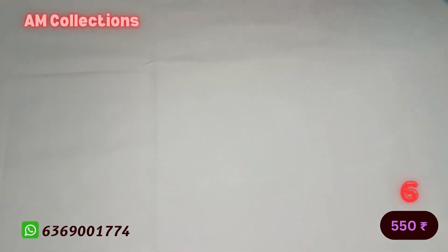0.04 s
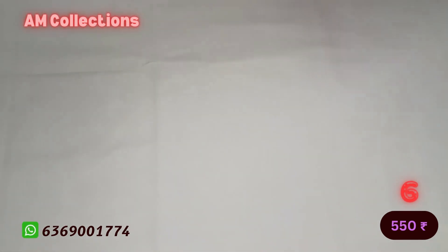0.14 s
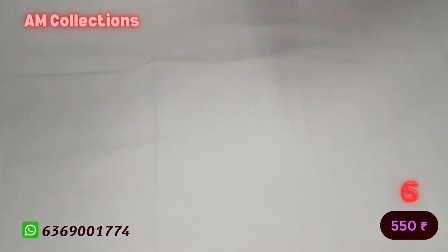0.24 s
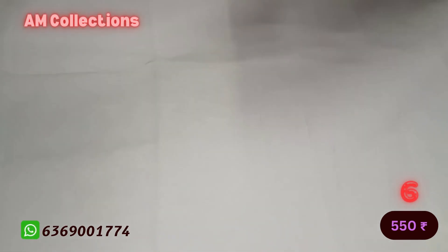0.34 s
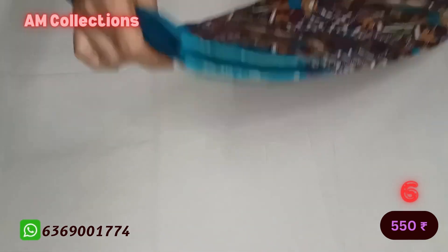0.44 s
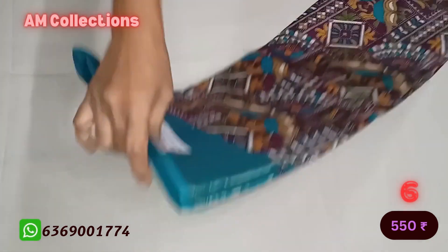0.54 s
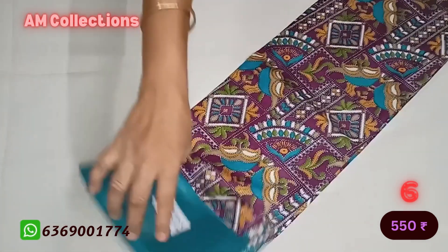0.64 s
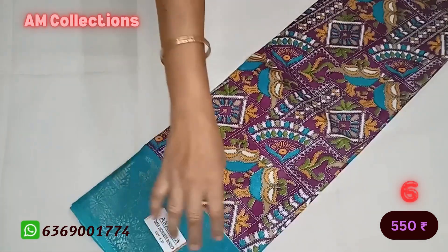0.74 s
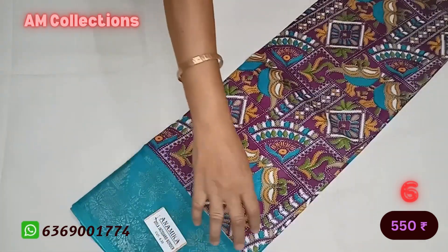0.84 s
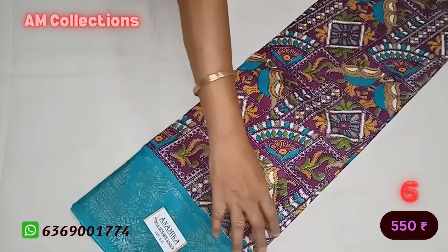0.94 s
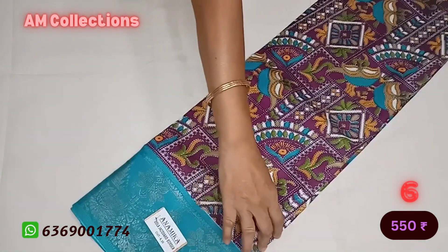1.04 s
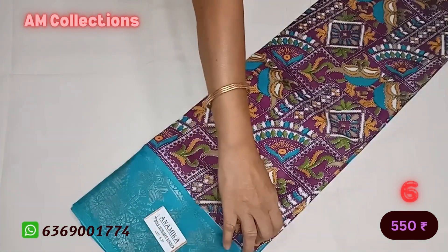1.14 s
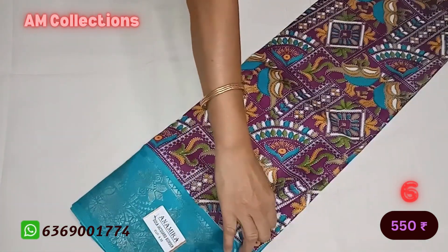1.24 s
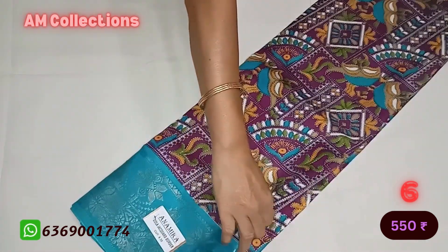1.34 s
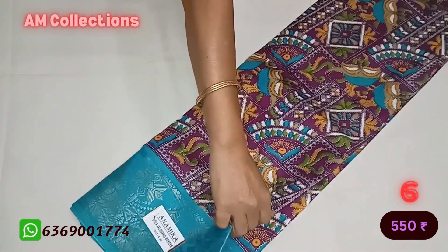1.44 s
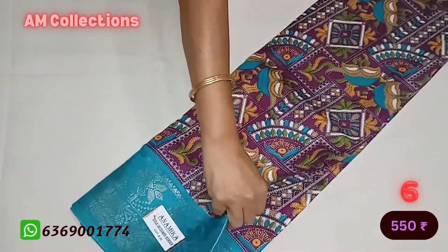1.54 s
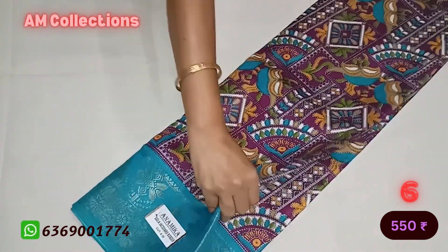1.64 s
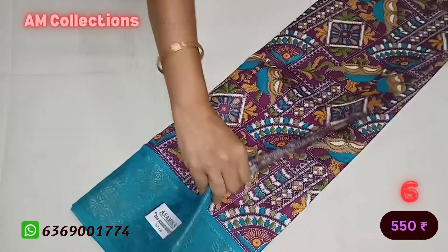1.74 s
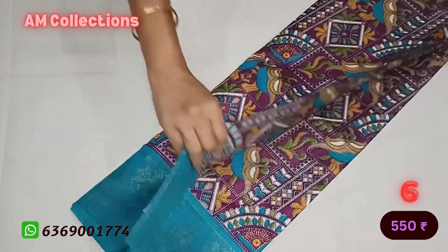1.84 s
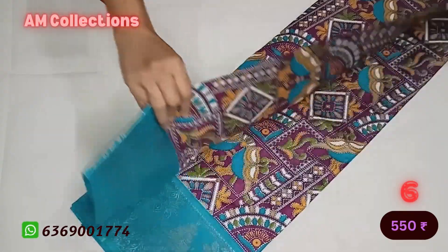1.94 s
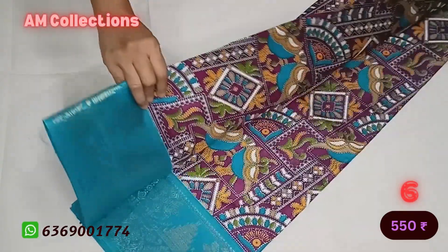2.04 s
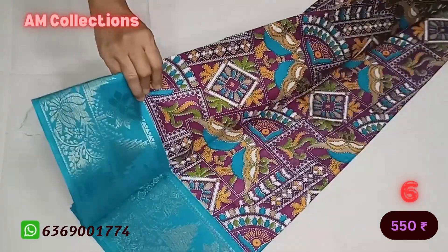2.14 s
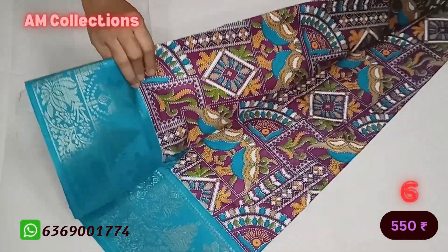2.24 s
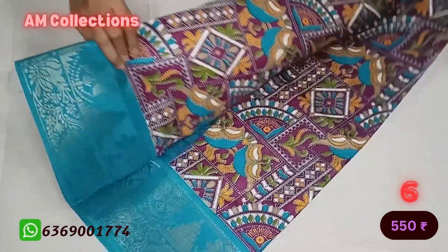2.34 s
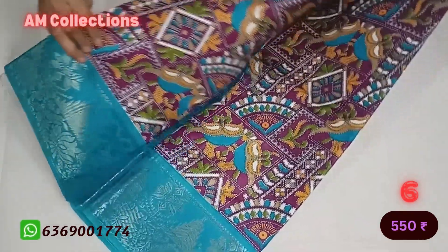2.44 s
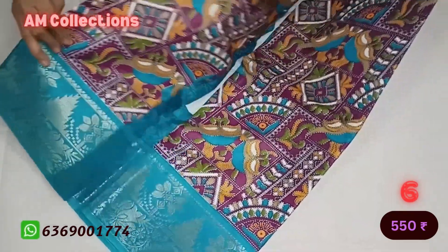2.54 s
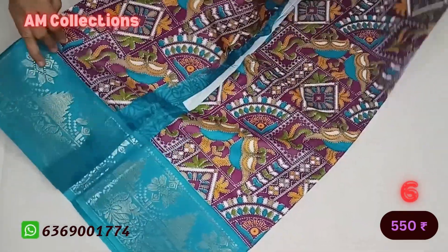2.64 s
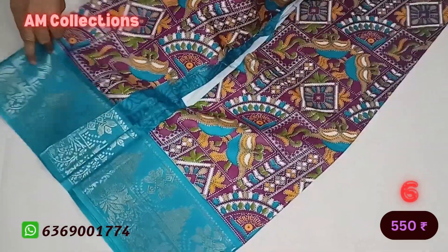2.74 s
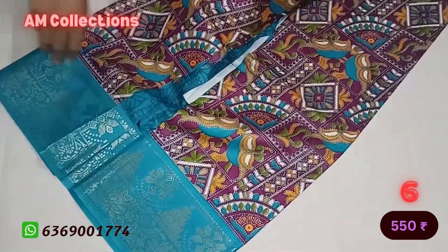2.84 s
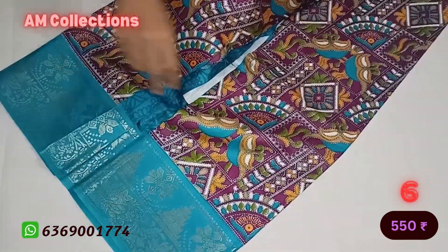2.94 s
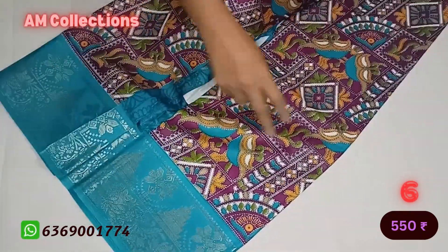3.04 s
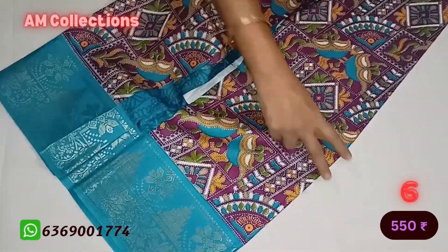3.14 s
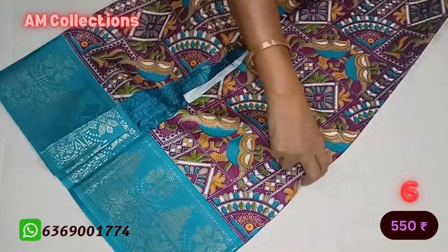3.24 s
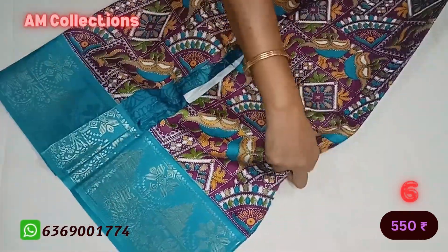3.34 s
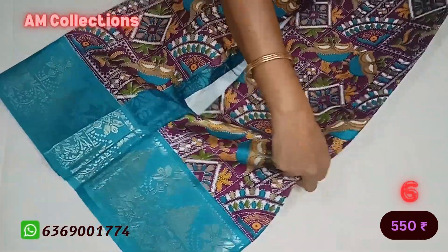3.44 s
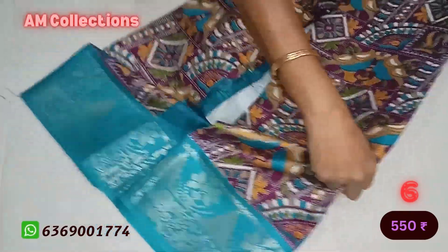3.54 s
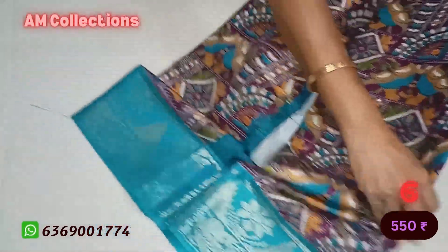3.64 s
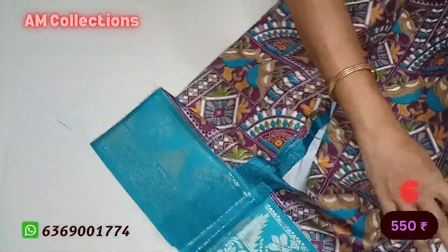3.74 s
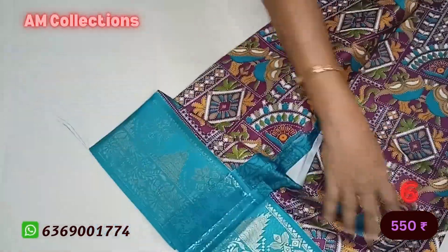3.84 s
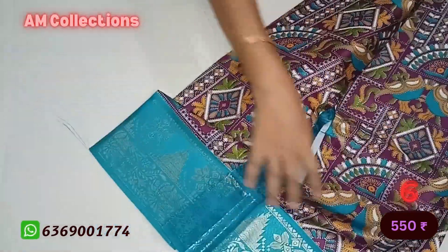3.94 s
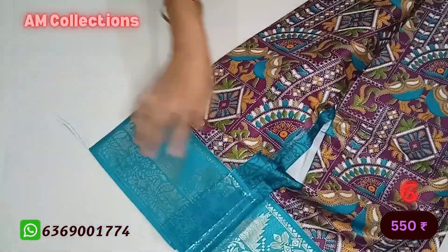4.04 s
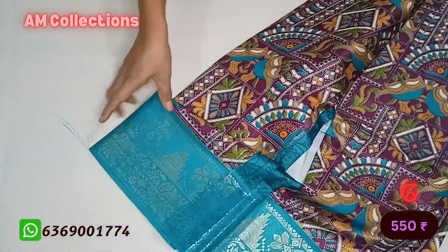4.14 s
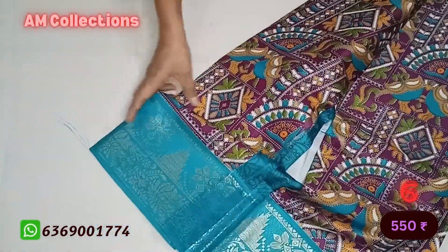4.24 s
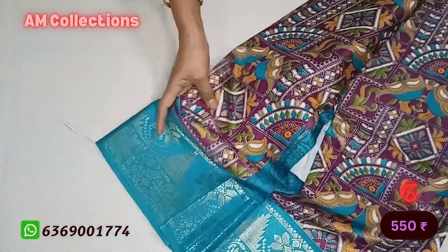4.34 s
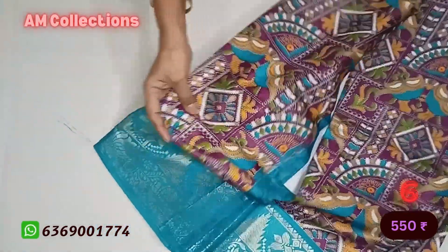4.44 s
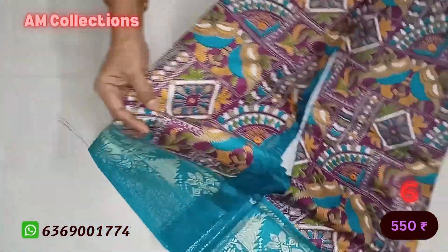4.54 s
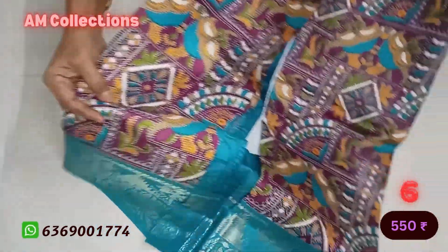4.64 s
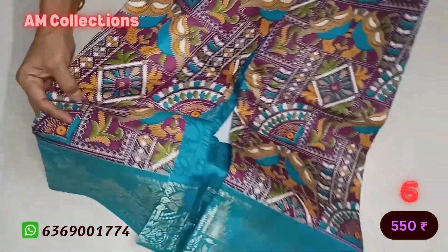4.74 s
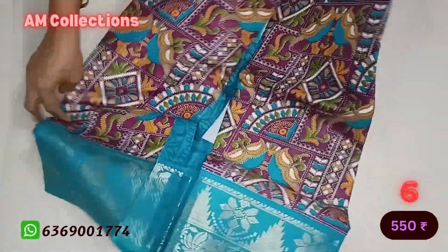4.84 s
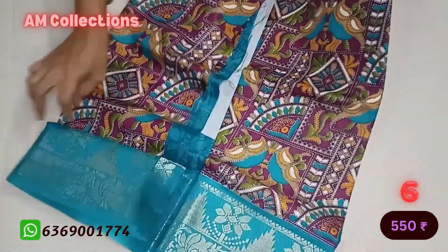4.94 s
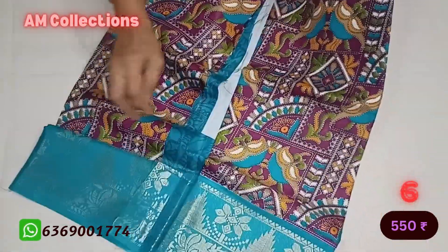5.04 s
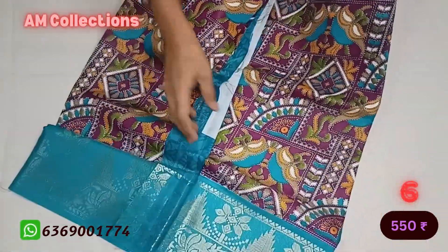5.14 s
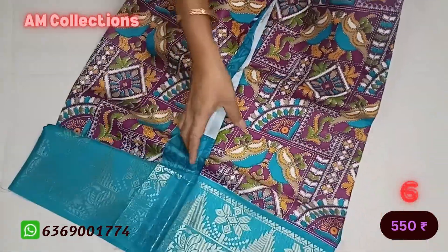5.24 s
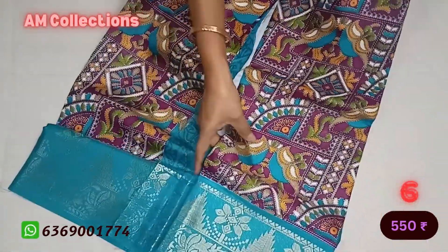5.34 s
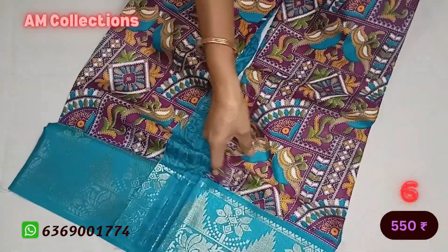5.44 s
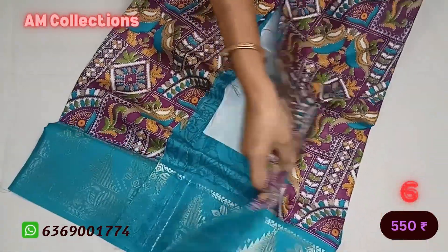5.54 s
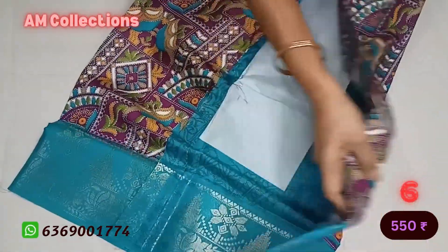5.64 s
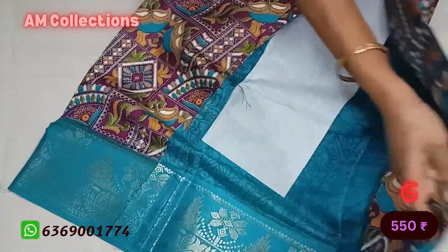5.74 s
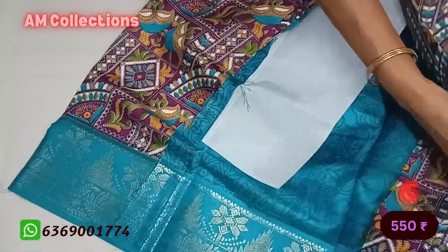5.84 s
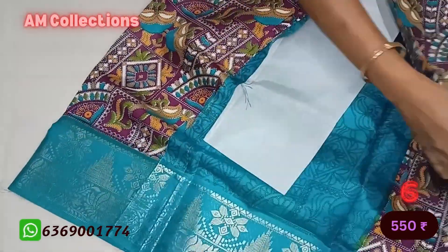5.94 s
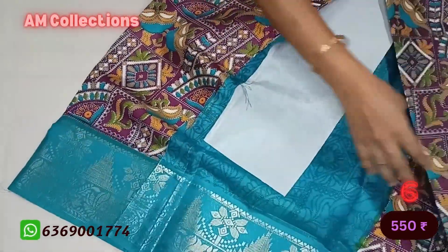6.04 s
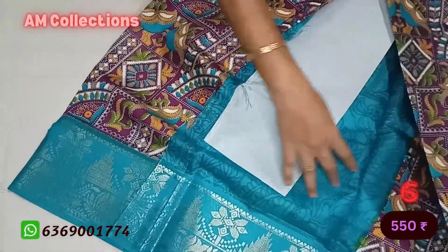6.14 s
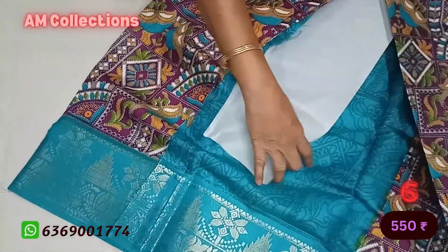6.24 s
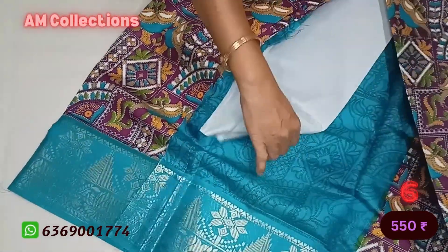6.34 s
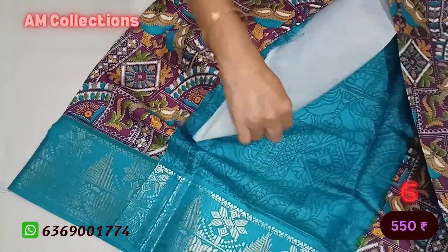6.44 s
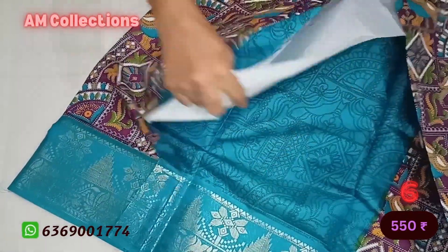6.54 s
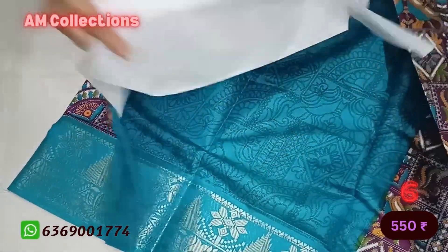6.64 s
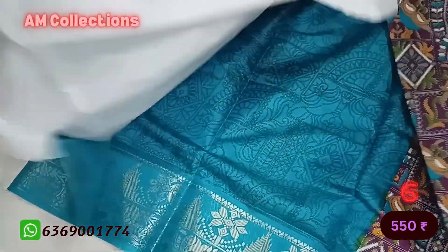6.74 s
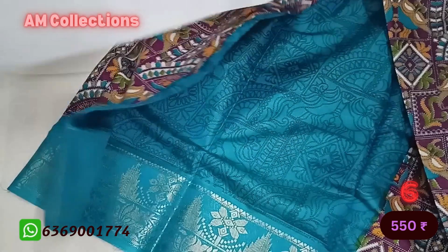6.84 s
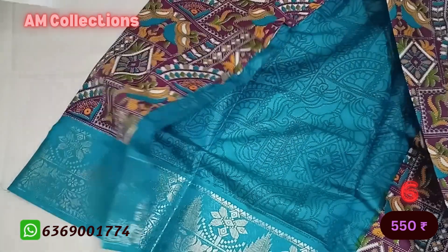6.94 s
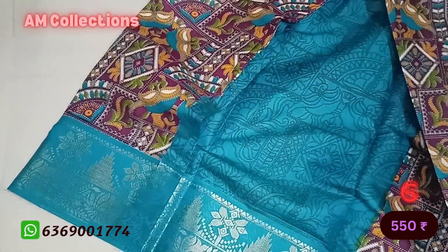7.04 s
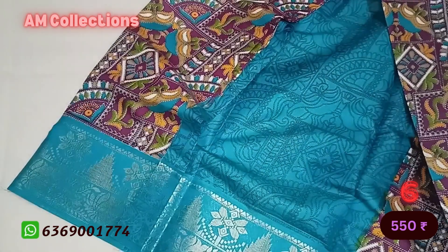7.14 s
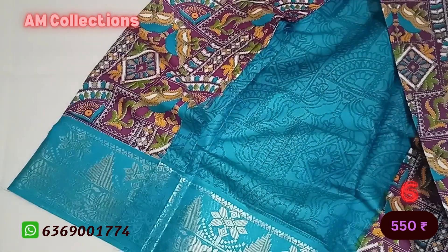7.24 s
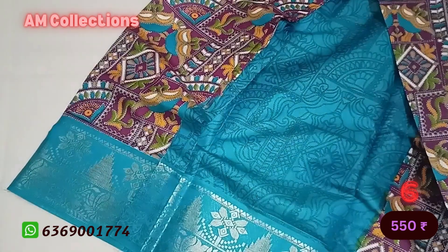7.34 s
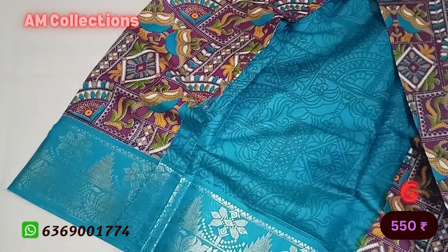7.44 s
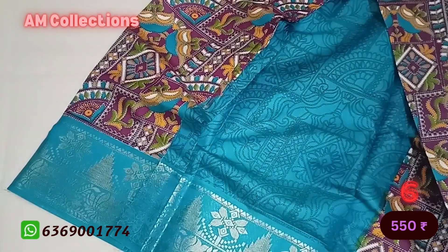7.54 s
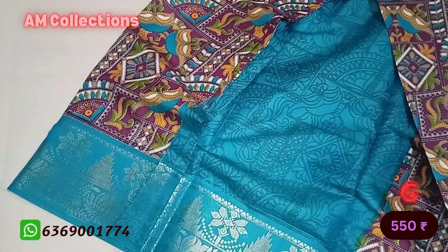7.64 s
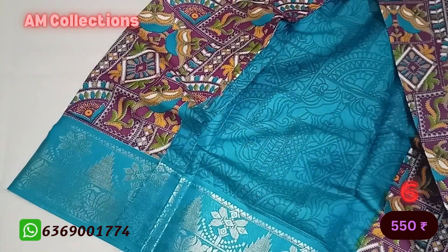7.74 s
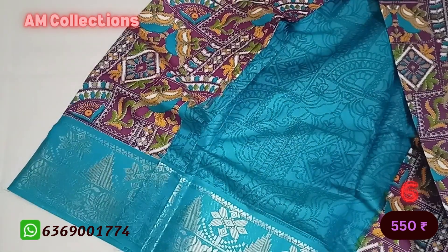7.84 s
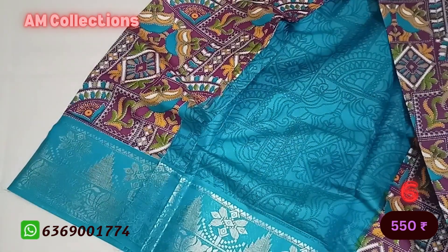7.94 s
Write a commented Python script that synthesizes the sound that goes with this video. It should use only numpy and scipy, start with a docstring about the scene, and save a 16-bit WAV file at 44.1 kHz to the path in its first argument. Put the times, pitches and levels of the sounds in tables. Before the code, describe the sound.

A stiff, glossy cloth is unfolded by hand on a table, rustling and crackling in bursts, loudest near the end.

```python
"""Unfolding a stiff, glossy garment

A stiff garment is laid on a table and unfolded by hand; its packing paper is pulled out.
Fibres hiss and tiny creases crackle in clumps; larger creases snap as filtered noise bursts.
Shaped noise gives the folds their flapping, knocks, puffs, gliding hums and pushed air.
A small room answers; faint clock ticks, faint tones and room air lie behind, in close stereo."""
import sys
import numpy as np
from scipy import signal
from scipy.fft import rfft, irfft, next_fast_len
from scipy.io import wavfile
from scipy.ndimage import uniform_filter1d

SR = 44100
rng = np.random.default_rng(int(sys.argv[2]) if len(sys.argv) > 2 else 0)


def log_audio(samples):
    """Write samples as a 16-bit WAV file to the path given in sys.argv[1]."""
    # one column per channel
    frames = np.atleast_2d(samples).T
    # limit to full scale, then quantise
    limited = np.clip(frames, -1, 1)
    pcm = np.round(limited * 32767).astype(np.int16)
    wavfile.write(sys.argv[1], SR, pcm)


N = 352800
TIME = np.arange(N) / SR


def amp(db):
    """Decibels to gain."""
    return 10 ** (np.asarray(db) / 20)


def unit(x):
    """Scales to rms 1."""
    return x / np.sqrt(np.mean(x ** 2) + 1e-20)


def noise(size):
    """Two independent channels of white noise: mid and side."""
    return rng.standard_normal((2, size))


def read(points, hz):
    """A curve joined by straight lines over log frequency."""
    f, value = np.transpose(points)
    return np.interp(np.log(hz + 1), np.log(f + 1), value)


def colour(x, gain):
    """Filters x by a gain given as a function of Hz."""
    size = next_fast_len(x.shape[-1] + 2048)
    spectrum = rfft(x, size) * gain(np.fft.rfftfreq(size, 1 / SR))
    return irfft(spectrum, size)[..., :x.shape[-1]]


def add(mix, s, sound):
    """Mixes a two-channel sound in at time s."""
    part = mix[:, max(round(s * SR), 0):][:, :sound.shape[1]]
    part += sound[:, :part.shape[1]]


def wander(per_s):
    """Smooth chance of rms 1 that takes per_s new values a second."""
    return unit(np.interp(TIME * per_s, np.arange(N // 32), rng.standard_normal(N // 32)))


def steady(x, size=1500):
    """Evens out the slow level of a texture and keeps its fine grain."""
    power = (x ** 2).mean(0)
    return x / np.sqrt(abs(uniform_filter1d(power, size)) + 1e-12)


def resonate(x, hz, width_hz):
    """A resonance that follows the curve hz: shift it to zero, smooth, shift back."""
    turn = np.exp(2j * np.pi * np.cumsum(hz) / SR)
    r = np.exp(-np.pi * width_hz / SR)
    return 2 * (turn * signal.lfilter([1 - r], [1, -r], x / turn)).real


# every movement gathers speed over its rise, slackens while it is held, then dies away
SWELL_DB, SLACKEN_DB_PER_S, SETTLE_DB_PER_S = 23, 28.5, 240.5


def movement(t, at_s, rise_s, hold_s):
    """Level in dB of one movement, 0 at full speed: it swells, slackens and settles."""
    age = t - at_s
    swell = SWELL_DB * (np.minimum(age, 0) / rise_s) ** 2
    slacken = SLACKEN_DB_PER_S * np.clip(age, 0, hold_s)
    settle = SETTLE_DB_PER_S * np.maximum(age - hold_s, 0)
    return np.maximum(-swell - slacken - settle, -120)


def together(levels_db):
    """The level in dB of several sounds at once: their powers add."""
    return 10 * np.log10((amp(levels_db) ** 2).sum(0))


# pulls, slides and shakes of the cloth: full speed at t/s, rise/s, hold/s, rustle level/dB,
# treble lift/dB (crispness), flapping level/dB, left over right/dB, hollow of the open fold f/Hz
CLOTH_STROKES = [(0.002, 0.062, 0.03, -51.0, 2, -47, -1, 560),
                 (0.054, 0.033, 0.028, -44, 11, -59.0, -4, 674),
                 (0.153, 0.093, 0.12, -52.5, 0.5, -68, -2, 800), (0.372, 0.2, 0.21, -70, -1, -77, -3, 402),
                 (0.659, 0.064, 0.04, -42.5, 6, -53.5, -8.5, 765),
                 (0.696, 0.049, 0.0038, -42.5, 8, -47.5, 5, 790),
                 (0.773, 0.044, 0.014, -42, -1, -42.5, -0.5, 567),
                 (1.164, 0.011, 0.018, -51.5, 1, -70, -5, 640),
                 (1.253, 0.046, 0.017, -54.5, 2, -66, -3, 790),
                 (1.32, 0.035, 0.013, -58, 8.5, -75, -6, 780),
                 (1.434, 0.023, 0.0032, -66.5, 10, -82.0, -7, 490),
                 (1.662, 0.16, 0.094, -72.5, 2.5, -74, 0, 530),
                 (1.846, 0.104, 0.016, -63.5, 8.5, -65, -5, 750),
                 (1.942, 0.058, 0.079, -55, 2.5, -62, -3, 606),
                 (2.122, 0.045, 0.004, -51.5, -1.5, -57, -1, 595),
                 (2.305, 0.089, 0.017, -56.5, -5.5, -77, -4, 740),
                 (2.397, 0.087, 0.094, -44.5, 3, -54, -10, 590),
                 (2.53, 0.05, 0.037, -42, 4, -55, -7.5, 560),
                 (2.647, 0.047, 0.027, -34.0, 1, -43, -2.5, 640),
                 (2.724, 0.048, 0.019, -41.5, 6.5, -49.5, -2, 600),
                 (2.824, 0.058, 0.077, -44.5, -2, -50.5, -1.5, 535),
                 (3.194, 0.12, 0.028, -76.5, 4, -80, -4, 480), (3.29, 0.072, 0.12, -57, 1, -64, -2, 567),
                 (3.372, 0.035, 0.098, -58.5, -4.5, -59.5, -11, 540),
                 (3.551, 0.096, 0.011, -45.5, 1.5, -53, -11.5, 534),
                 (3.624, 0.052, 0.024, -53.0, 0, -53.5, -9, 570),
                 (3.79, 0.17, 0.07, -44, 1.5, -52, -7, 656), (3.908, 0.044, 0.019, -46.5, 4, -56, -3, 585),
                 (3.957, 0.033, 0.083, -50, -5.5, -58, -3, 550),
                 (4.128, 0.019, 0.01, -58, -13, -79.0, -6, 390),
                 (4.269, 0.076, 0.13, -64, -5, -69, -10, 785),
                 (4.437, 0.091, 0.004, -52.5, -1.5, -64, -2.5, 670),
                 (4.49, 0.045, 0.097, -33.0, 1.5, -53, -2, 660),
                 (4.588, 0.11, 0.13, -42.5, 6.5, -48, -2.5, 580),
                 (4.724, 0.034, 0.05, -40.5, 3.5, -51, -2, 544),
                 (4.92, 0.12, 0.12, -36.5, 1, -46.5, -1.5, 575),
                 (5.192, 0.14, 0.055, -57.5, -12, -85, -1.5, 480),
                 (5.279, 0.02, 0.046, -48.5, -3.5, -74, -2, 800),
                 (5.367, 0.037, 0.078, -46, -3.5, -83, -1, 790), (5.451, 0.063, 0.08, -57, 5, -61, -8, 756),
                 (5.586, 0.053, 0.058, -52.5, -3.5, -66, -14.5, 560),
                 (5.726, 0.1, 0.061, -42, 0.5, -52.5, -11, 600),
                 (5.875, 0.067, 0.005, -44, 1, -53, -9.5, 423),
                 (5.996, 0.099, 0.077, -45, 0, -49.5, -10.5, 577),
                 (6.3, 0.042, 0.021, -34.5, 1, -55.5, -3, 730),
                 (6.358, 0.033, 0.083, -34.0, 8, -44.5, -1.5, 620),
                 (6.482, 0.026, 0.018, -28, 4.5, -41, -1, 565),
                 (6.568, 0.057, 0.032, -26.5, 1.5, -41.5, -2, 684),
                 (6.678, 0.078, 0.1, -29.5, 5, -41, -1, 615), (6.829, 0.062, 0.014, -30, 2, -42.5, 0, 550),
                 (6.915, 0.029, 0.086, -35.5, -1, -46, 1, 690),
                 (7.05, 0.042, 0.067, -49.5, -6.5, -60, 0, 560),
                 (7.184, 0.059, 0.053, -33.5, 1.5, -49.5, 0.5, 660),
                 (7.396, 0.16, 0.074, -37, 4, -49, 0, 670), (7.6, 0.11, 0.04, -45, -1.5, -58, 0, 704),
                 (7.678, 0.048, 0.059, -40.5, -3.5, -55.5, -1, 705),
                 (7.948, 0.053, 0.028, -46.5, -10.5, -69, 0, 370),
                 (7.995, 0.043, 0.009, -45, 8, -66, -2, 770)]
# wide swings of the sheet that fan air at the microphone: full speed at t/s, rise/s, hold/s, level/dB
AIR_SWINGS = [(0.005, .05, 0.041, -54), (0.63, 0.042, .05, -55), (2.542, .04, 0.018, -58),
              (4.566, .06, .05, -55), (5.884, 0.093, .03, -62), (6.46, .05, 0.048, -57),
              (6.837, 0.046, .02, -49.5), (6.98, .05, 0.044, -53), (7.202, 0.036, 0.06, -51.5),
              (7.45, 0.11, 0.021, -55.5)]
DULLING = 0.16  # dB of treble lost for each dB that a stroke is below full speed
DRAUGHT_DB = -20.5  # air pushed by any flapping, relative to it, before the trims in sheet()


def handling(size=64):
    """Overlapping strokes add in power and the loudest sets the character; gives six curves over time."""
    t = TIME[::size]
    speed_db = np.array([movement(t, *row[:3]) for row in CLOTH_STROKES])
    rustle_db, crisp_db, flap_db, lean_db, fold_hz = np.transpose(CLOTH_STROKES)[3:, :, None]
    level = together(rustle_db + speed_db)
    flap = together(flap_db + speed_db)
    swings = [db + movement(t, *shape) for *shape, db in AIR_SWINGS]
    air = together([flap + DRAUGHT_DB] + swings)

    share = amp(rustle_db + speed_db - level) ** 2
    dulled_db = crisp_db + DULLING * np.maximum(speed_db, -30)
    character = [(share * value).sum(0) for value in (dulled_db, lean_db, fold_hz)]
    return [np.interp(TIME, t, curve) for curve in (level, flap, air, *character)]


def chance_powers(per_s, spread_db):
    """Random moments with powers of uneven size, per_s of them a second on average."""
    size_db = spread_db * np.minimum(rng.exponential(1, N), 3)
    return amp(size_db) ** 2 * (rng.random(N) < per_s / SR)


def avalanches(per_s, spread_db, decay_s):
    """One crease sets off its neighbours: activity jumps at random moments and runs out."""
    jumps = chance_powers(per_s, spread_db)
    activity = signal.lfilter([1], [1, -np.exp(-1 / (decay_s * SR))], jumps)
    return unit(np.sqrt(0.46 + activity))


def crackle(level_db, per_s, spread_db, decay_ms, hiss_db, crowding=.5, count=12):
    """Countless small creases give way in bursts, each exciting one of many facets, over fibre hiss."""
    # harder handling: more creases at once
    rate = per_s * amp(crowding * np.clip(level_db + 42, -12, 15))
    power = chance_powers(rate, spread_db)
    facet = rng.integers(0, count, N)
    keep = np.exp(-2 * 10 ** 3 / SR / decay_ms)  # power left after one sample
    out = np.zeros((2, N))
    for k, hz in enumerate(np.geomspace(1500, 14000, count)):
        envelope = np.sqrt(signal.lfilter([1], [1, -keep], power * (facet == k) + 1e-12))
        bursts = envelope * noise(N)
        out += signal.lfilter(*signal.iirpeak(hz, 2, fs=SR), bursts) + 0.39 * bursts
    out = steady(out, size=2500) + amp(hiss_db) * noise(N)
    return steady(out * avalanches(per_s=120, spread_db=2.5, decay_s=0.0099), size=1200)


# colour of the crackle: f/Hz, relative level/dB
CRINKLE_COLOUR = [(450, -33.5), (900, -8.5), (1400, -6.5), (2700, -2), (3400, -3.5), (4200, -1.5),
                  (5200, -2), (6600, .5), (8000, -5), (9500, -4.5), (12500, -9), (16000, -14)]


def rustle(grain, level_db, crisp_db, echo=0.28):
    """The table top mirrors the crackle, shifting its colour as the cloth moves; crispness adds treble."""
    hz, t, z = signal.stft(grain, SR, nperseg=512)
    lift_db = np.clip(np.interp(t, TIME, crisp_db), -14, 8)
    # share of the treble lift by frequency: negative points turn against it
    tilt = read([(1500, -.35), (5000, 0), (7000, .15), (11000, .85), (16000, 1)], hz)
    tilt_db = np.outer(tilt, lift_db)
    delay_s = 0.000497 * np.exp(.5 * np.interp(t, TIME, wander(16)))
    mirror = 1 + echo * np.exp(-2j * np.pi * np.outer(hz, delay_s))
    x = signal.istft(z * amp(tilt_db) * mirror, SR, nperseg=512)[1][:, :N]
    x = unit(colour(x, lambda f: amp(read(CRINKLE_COLOUR, f))))
    return x * amp(level_db + 0.27)


# colour of the flapping sheet: f/Hz, relative level/dB
FLAP_COLOUR = [(100, -51.5), (230, -4), (400, 2), (540, 3.5), (700, 1.5), (1000, -2.5), (1600, -10),
               (3500, -49)]
# colour of the pushed air: f/Hz, relative level/dB
PUSH_COLOUR = [(20, -17.5), (45, -23), (75, -1), (140, 2), (250, 1.5), (350, 3), (700, -27.5)]


def sheet(grain, flap_db, push_db, fold_hz, lumps_db=2.5):
    """The same buckling shakes the whole sheet, which pushes air and rings in the hollow of the open fold."""
    shaken = grain + amp(-2.5) * noise(N)
    body = colour(shaken, lambda f: amp(read(FLAP_COLOUR, f)))
    flap = steady(body + resonate(body, fold_hz, width_hz=75), size=2400)
    push = steady(colour(noise(N), lambda f: amp(read(PUSH_COLOUR, f))), size=4000)
    return flap * amp(flap_db - 4.0 + lumps_db * wander(40)) + push * amp(push_db - 0.5)


def crease(hz, decay_ms, ring_q, dry, tick=0.35, size=1400):
    """One crease buckles: a sharp tick and a dying burst, partly ringing in the facet next to it."""
    ms = np.arange(size) / SR * 10 ** 3
    burst = noise(size) * (np.exp(-ms / decay_ms) + tick * np.exp(-ms / 0.1))
    ring = signal.lfilter(*signal.iirpeak(hz, ring_q, fs=SR), burst)
    return unit(ring + dry * burst) / np.sqrt(size)


# creases that snap: t/s, peak level/dB (before trim), ring f/Hz, burst decay/ms
CREASE_SNAPS = [(0.4923, -46, 8060, 2.8), (0.5967, -37, 6570, 2.8), (0.645, -26, 7180, 2.5),
                (0.6843, -20, 5740, 3.2), (0.7709, -14, 7540, 2.3), (1.1585, -33.5, 5820, 2.8),
                (1.2203, -29.5, 6850, 2.1), (1.2506, -34, 7710, 2.8), (1.3364, -34.5, 7460, 2.8),
                (1.4251, -39, 5800, 2.8), (1.75, -43, 2400, 3), (1.8234, -35, 4130, 3.3),
                (2.0997, -37.5, 2950, 3.3), (2.2985, -33, 5170, 3.2), (2.368, -24.5, 6500, 2.8),
                (2.539, -25, 6450, 2.8), (2.5706, -19, 7580, 2.2), (2.6304, -20, 6360, 2.8),
                (2.6416, -15, 6670, 2.3), (2.831, -24, 2740, 2), (2.9032, -32, 2520, 2.8),
                (3.249, -34, 2560, 3.2), (3.3169, -36, 6730, 3.3), (3.3704, -30.5, 3870, 2.6),
                (3.4545, -37.5, 4560, 2.8), (3.5104, -27, 6240, 2.8), (3.5385, -20.5, 6240, 2.6),
                (3.7055, -22, 5770, 2), (3.73, -32, 6520, 2.6), (3.7594, -21.5, 4370, 2.8),
                (3.8203, -23, 5140, 2.8), (3.9545, -30, 5870, 3.7), (4.121, -35.5, 8600, 3.1),
                (4.4678, -20, 5260, 2.8), (4.5005, -17.5, 6530, 3.1), (4.5507, -15, 6000, 2.6),
                (4.717, -25, 6450, 2.8), (4.8294, -24, 4560, 2.6), (5.2073, -26.5, 5800, 1.8),
                (5.2789, -29, 4070, 2.6), (5.324, -27.5, 5400, 2.8), (5.3646, -22.5, 5810, 2.1),
                (5.476, -29, 2390, 4), (5.7047, -19.5, 6600, 3.6), (5.753, -23, 6700, 4),
                (5.9498, -24.5, 6650, 2.8), (5.975, -23, 2570, 2.8), (5.9963, -23, 5770, 3.1),
                (6.2724, -20.5, 5870, 4.1), (6.3457, -15.5, 6790, 3.2), (6.442, -13.5, 5640, 2.8),
                (6.4772, -17, 9510, 2.8), (6.4886, -13, 7680, 3.2), (6.5553, -12, 5800, 2.8),
                (6.7397, -15, 5300, 3.1), (6.8159, -17, 4200, 2.1), (6.8762, -20, 5490, 2.5),
                (6.949, -19, 6860, 2.5), (7.1561, -19.5, 6960, 2.8), (7.1805, -15, 5230, 4.6),
                (7.3976, -16, 6700, 2.6), (7.6665, -23, 7010, 4.6), (7.9226, -34, 4910, 2.8)]


def snaps():
    """Larger creases let go one at a time, each a short noise burst coloured by its ring."""
    out = np.zeros((2, N))
    for s, db, hz, decay_ms in CREASE_SNAPS:
        # crease() has fixed energy: a longer burst needs more gain for the same peak
        gain = amp(db - 8.5) * np.sqrt(decay_ms * SR / 10 ** 3 / 2)
        add(out, s, gain * crease(hz, decay_ms, ring_q=4.9, dry=0.31))
    return colour(out, lambda f: f / np.hypot(f, 600))  # thins the lows


# slack folds that flip over: t/s, peak level/dB (before trim), hollow f/Hz
FOLD_FLOPS = [(0.674, -40, 820), (1.916, -47.5, 630), (2.124, -67, 670), (2.474, -41.5, 450),
              (2.538, -37, 607), (2.644, -37, 860), (2.81, -43.5, 530), (2.858, -41, 513),
              (3.537, -43.5, 538), (3.784, -41.5, 594), (3.849, -54, 354), (4.255, -61, 665),
              (4.32, -64, 800), (4.414, -54, 664), (4.497, -38, 800), (4.53, -39.5, 614),
              (4.897, -36.5, 526), (4.976, -43, 640), (5.587, -52, 540), (5.745, -44, 560),
              (5.989, -42, 586), (6.674, -32, 714), (6.829, -35, 516), (7.672, -49, 660)]


def flops(width_hz=260, rise_s=0.007, decay_s=0.0091):
    """A fold flips and squeezes out its air: a soft, hollow knock."""
    out, t = np.zeros((2, N)), np.arange(SR // 8) / SR
    shape = (1 - np.exp(-t / rise_s)) * np.exp(-t / decay_s)
    for s, db, hz in FOLD_FLOPS:
        ring = colour(noise(len(t)), lambda f: 1 / (1 + (2 * (f - hz) / width_hz) ** 2))
        add(out, s, amp(db - 6.5) * steady(ring, size=500) * shape / shape.max())
    return out


# cloth drops onto the table: t/s, level/dB (before trim)
CLOTH_PATS = [(0.7656, -29.5), (0.782, -36.5), (6.46, -47), (6.689, -35)]
# colour of the padded table: f/Hz, relative level/dB
THUD_COLOUR = [(30, -46.5), (60, -27), (120, -8), (260, 9.5), (400, -2), (580, 7.5), (750, -30), (1500, -9),
               (4000, -12.5)]


def pats(decay_s=0.016):
    """The cloth flops onto the padded table: a dull puff that dies quickly."""
    out, t = np.zeros((2, N)), np.arange(SR // 4) / SR
    shape = np.exp(-t / decay_s) * np.minimum(t / 0.0009, 1)
    for s, db in CLOTH_PATS:
        puff = steady(colour(noise(len(t)), lambda f: amp(read(THUD_COLOUR, f))), size=600)
        add(out, s, amp(db - 1.0) * puff * shape)
    return out


# the hand slides under a fold: start t/s, end t/s, first f/Hz, last f/Hz, level/dB
HAND_SLIDES = [(1.82, 2.017, 740, 610, -68), (2.24, 2.505, 830, 544, -69.5), (4.209, 4.387, 730, 820, -67),
               (4.371, 4.5, 640, 760, -59.5), (5.518, 5.676, 710, 497, -64)]


def slides(width_hz=70):
    """Rubbing noise rings in the hollow of a fold, which glides as the hand moves on."""
    out = np.zeros((2, N))
    for start, end, first_hz, last_hz, db in HAND_SLIDES:
        size = round((end - start) * SR)
        hollow_hz = np.linspace(first_hz, last_hz, size)
        hum = resonate(noise(size), hollow_hz, width_hz)
        add(out, start, amp(db) * unit(hum) * signal.windows.tukey(size, .7))
    return out


# reverberation of the room: f/Hz, t60/s
ROOM_T60 = [(200, 0.19), (600, 0.27), (1500, 0.3), (4000, 0.33), (10000, 0.22), (16000, 0.25)]


def room(x, wet_db, gap_s):
    """Sparse reflections set in over a short gap and die away at a rate that depends on frequency."""
    taps = rng.choice([-1., 1.], (2, SR // 2)) * (rng.random((2, SR // 2)) < 4000 / SR)
    hz, t, z = signal.stft(taps, SR, nperseg=256)
    z = z * amp(-60 * t / read(ROOM_T60, hz)[:, None]) * np.clip(t / gap_s, 0, 1) ** 2
    tail = signal.istft(z, SR, nperseg=256)[1]
    tail /= np.linalg.norm(tail, axis=1, keepdims=True)
    return x + amp(wet_db) * signal.fftconvolve(x, tail, axes=1)[:, :N]


# width of the microphone pair: f/Hz, side over mid level/dB
STEREO_WIDTH = [(60, -9), (200, -10), (400, -10.5), (700, -7.5), (1300, -1.5), (2400, -1), (5500, .5),
                (8000, -7.5), (16000, -8.5)]


def ports(x):
    """Mid and side become left and right; the pair is widest in the lower treble."""
    side = colour(x[1], lambda f: amp(read(STEREO_WIDTH, f)))
    return np.array([x[0] + side, x[0] - side])


# resonances of the wall clock's case: f/Hz, width/Hz, relative level/dB
CLOCK_CASE = [(807, 21, 8.5), (1221, 95, 6), (1350, 140, -2), (1830, 200, -1.5), (2620, 380, -4.5),
              (3700, 330, -19), (5640, 1800, -7)]


def clock(first_s, rise_s, decay_s, db):
    """A wall clock steps once a second, so far off that only its swell of reflections arrives."""
    out, t = np.zeros((2, N)), np.arange(SR // 3) / SR
    swell = (1 - np.exp(-(t / rise_s) ** 2)) * np.exp(-t / decay_s)

    def case(f):
        return sum(amp(level) / (1 + (2 * (f - hz) / width) ** 2) for hz, width, level in CLOCK_CASE)

    for second in range(N // SR):
        ring = colour(noise(len(t)), case)
        add(out, first_s + second, amp(db) * steady(ring) * swell / swell.max())
    return out


# faint tones in the background: start t/s, end t/s, f/Hz, level/dB
FAINT_TONES = [(7.46, 7.834, 521, -64.5), (7.847, 7.998, 328, -65)]


def tones(waver_hz=3.5, waver_db=2.0):
    """Faint sine tones swell, waver in pitch and level, and fade far off, in the middle of the image."""
    out = np.zeros((2, N))
    for start, end, hz, db in FAINT_TONES:
        size = round((end - start) * SR)
        turns = np.cumsum(hz + waver_hz * wander(30)[:size]) / SR
        gain = amp(db + waver_db * wander(25)[:size]) * signal.windows.tukey(size, .6)
        add(out, start, np.outer([1, 0], gain * np.sin(2 * np.pi * turns)))
    return out


# colour of the room air: f/Hz, relative level/dB
AIR_COLOUR = [(25, -20.5), (50, -17), (75, -9), (130, -1.5), (175, -12), (330, -9.5), (550, -14),
              (900, -21.5), (2000, -30.5), (6000, -35.5), (16000, -34)]
QUIET_DB = -71


def background(waver_db=2.0):
    """Steady room air, with a low rumble that swells and sinks."""
    air = unit(colour(noise(N), lambda f: amp(read(AIR_COLOUR, f))))
    rumble = colour(air, lambda f: 1 / (1 + (f / 450) ** 4))
    return amp(QUIET_DB) * (air + rumble * (amp(waver_db * wander(12)) - 1))


# how the two ports differ: f/Hz, left over right level/dB
PORT_TILT = [(700, 0), (3000, 1), (6200, -1), (9000, 0), (12000, 2.5), (16000, -0.5)]


def scene():
    """The cloth moves between the two ports, in a quiet room; snaps and soft knocks stir the room most."""
    level_db, flap_db, push_db, crisp_db, lean_db, fold_hz = handling()
    grain = crackle(level_db, per_s=1700, spread_db=4.5, decay_ms=0.28, hiss_db=3.5)
    rubbing = rustle(grain, level_db, crisp_db) + sheet(grain, flap_db, push_db, fold_hz)
    rubbing = room(rubbing, wet_db=-11, gap_s=0.0069)
    accents = room(snaps() + flops() + pats(), wet_db=-6.5, gap_s=0.0025)
    cloth = ports(rubbing + accents)

    # the cloth leans left or right mostly in the treble
    treble = colour(cloth, lambda f: f ** 2 / (f ** 2 + 1100 ** 2) / (1 + (f / 14000) ** 4))
    lean = amp(np.outer([.5, -.5], lean_db))
    cloth = cloth + treble * (lean / lean.mean(0) - 1)
    cloth = colour(cloth, lambda f: amp(np.outer([.5, -.5], read(PORT_TILT, f))))

    ticks = clock(first_s=.213, rise_s=0.077, decay_s=0.034, db=-60.0)
    return cloth + ports(slides() + ticks + tones() + background())


def record(dry):
    """The recorder's band limit: a steep low-pass."""
    lowpass = signal.firwin(511, 16100, window=("kaiser", 9), fs=SR)
    return signal.oaconvolve(dry, lowpass[None], "same")


dry = scene()
out = record(dry)
log_audio(out)
```